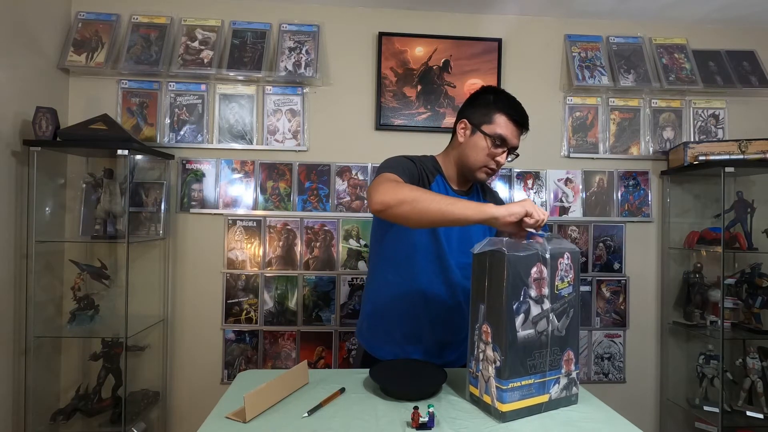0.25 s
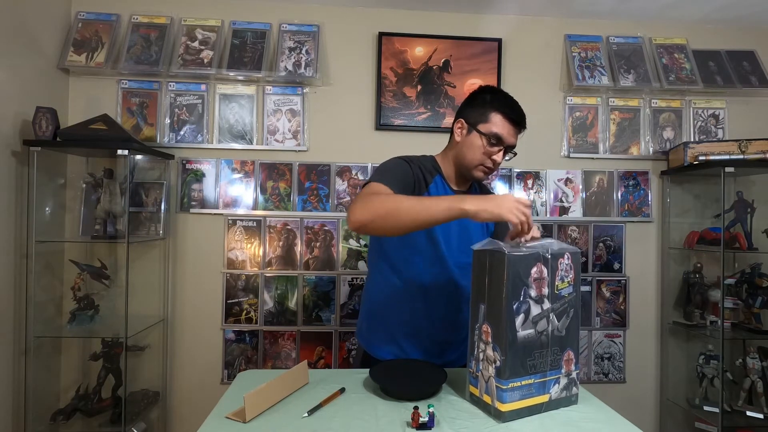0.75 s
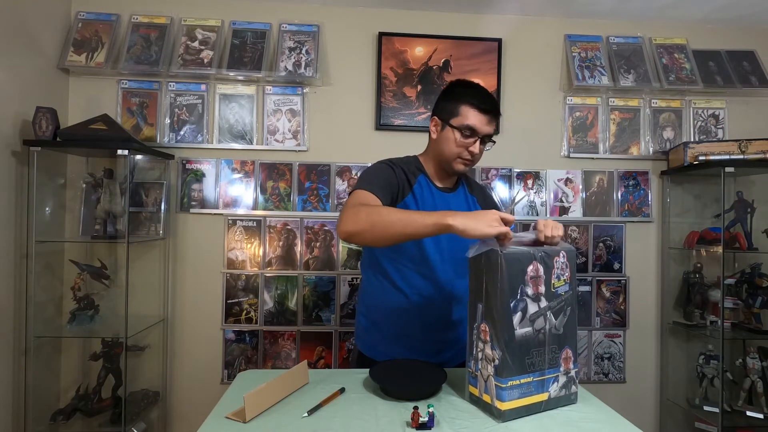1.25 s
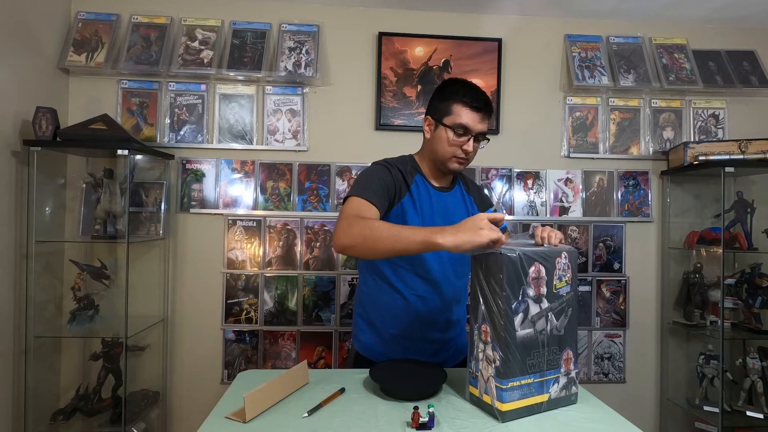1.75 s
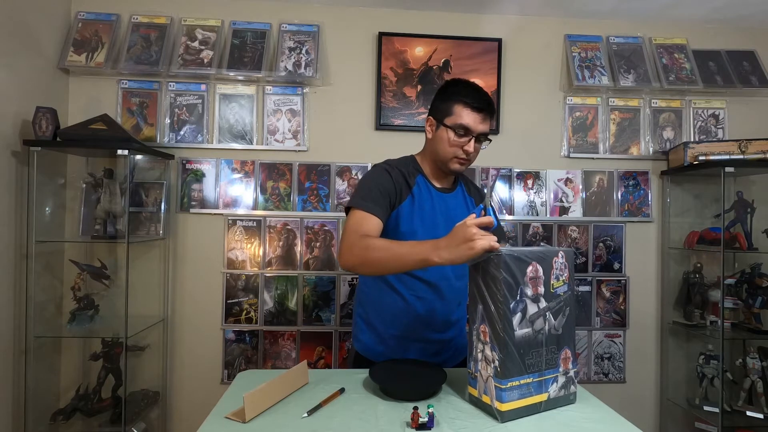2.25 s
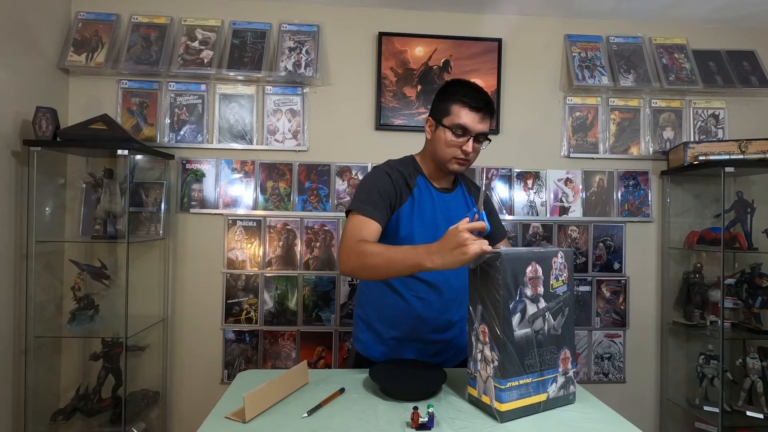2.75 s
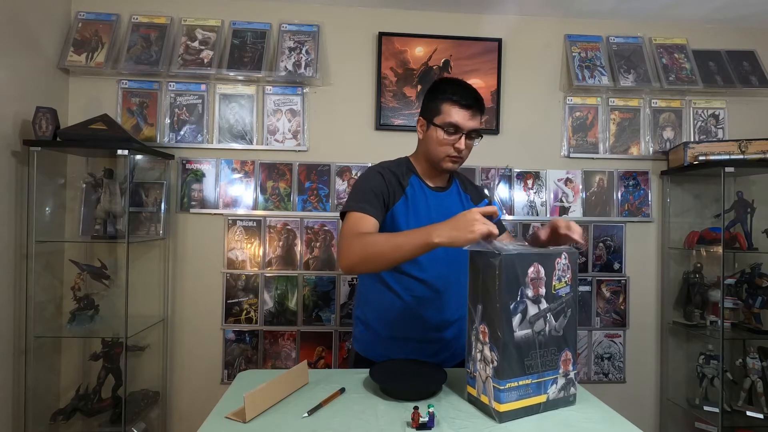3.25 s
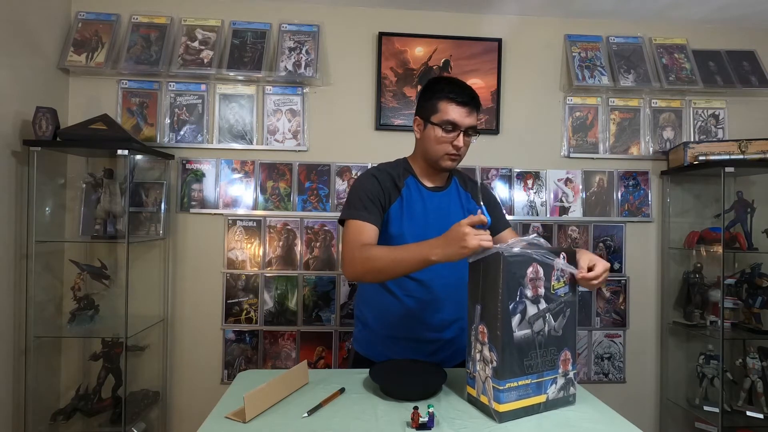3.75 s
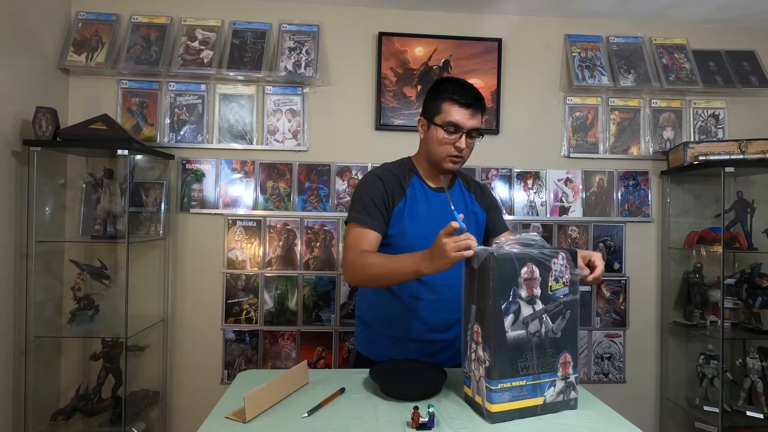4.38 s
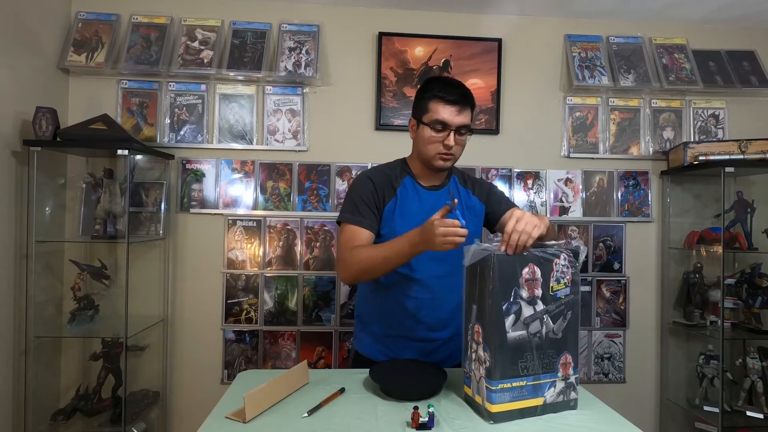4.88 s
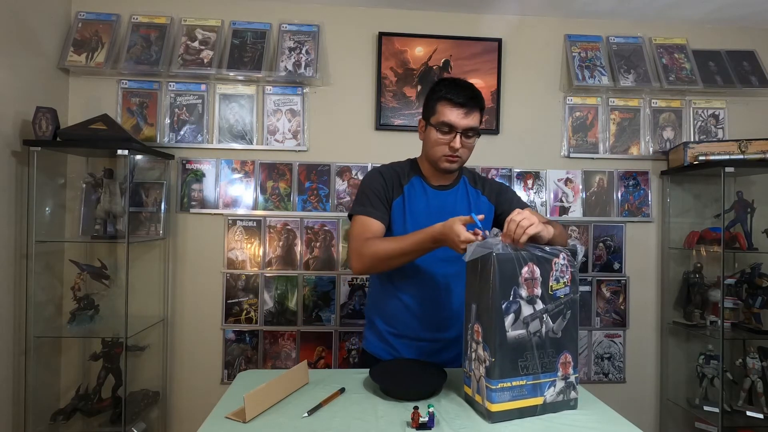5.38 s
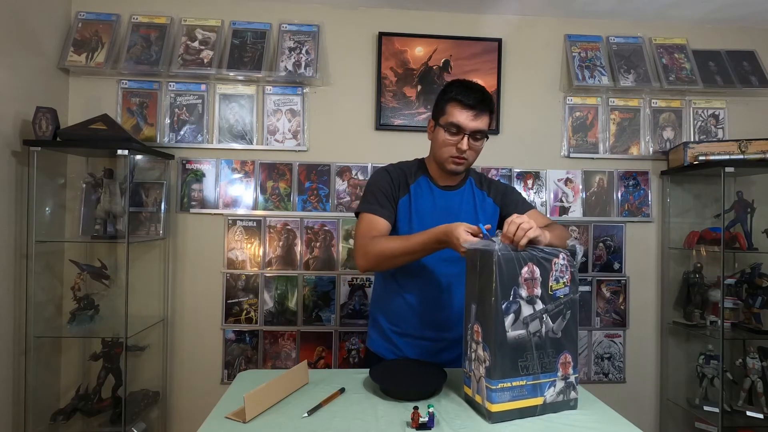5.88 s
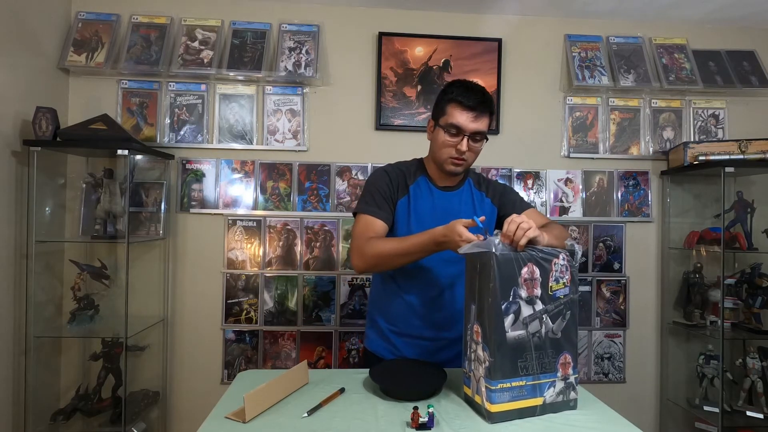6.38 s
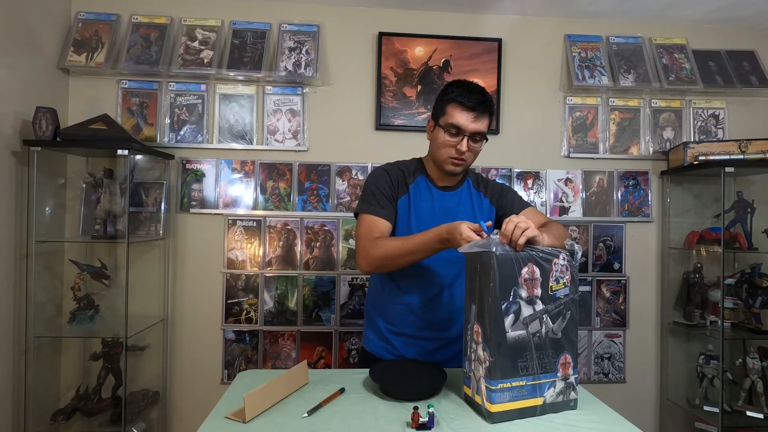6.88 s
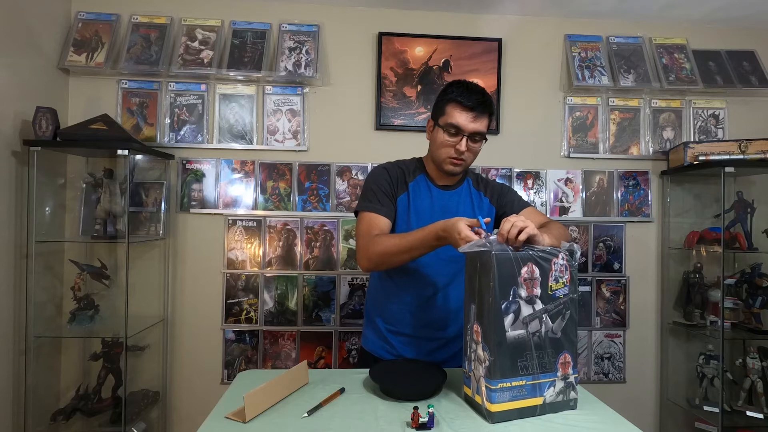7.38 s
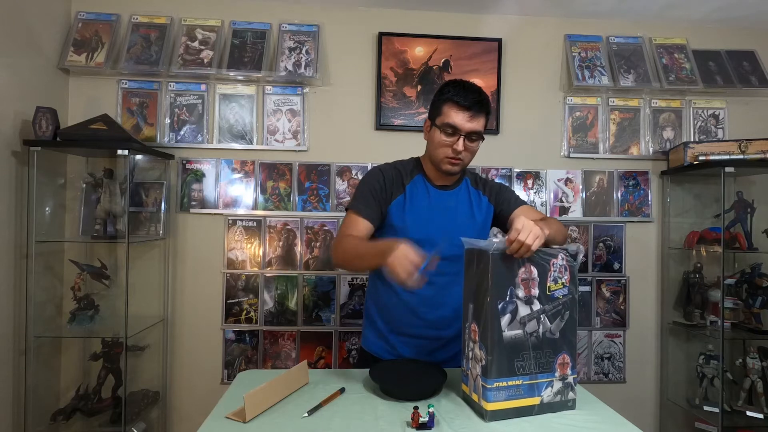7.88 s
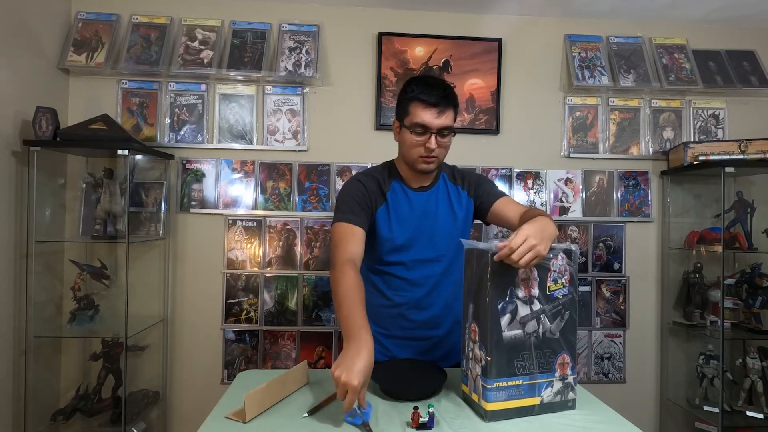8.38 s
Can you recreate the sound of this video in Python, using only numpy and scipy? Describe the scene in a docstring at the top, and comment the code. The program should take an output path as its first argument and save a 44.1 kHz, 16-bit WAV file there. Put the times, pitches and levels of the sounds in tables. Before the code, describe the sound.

Irregular sharp plastic crackles and light box taps in a furnished room, with low air buffeting the microphone and a brief scissor rattle at the end.

```python
"""Sharp snaps and fine crinkling come first: stiff plastic film is cut and pulled off a cardboard box
in a furnished room. Creases flex patches of film and tap the box; at the end scissors, modelled as
ringing modes, rattle on the table. A draught, probably from a fan, carries eddies past the two ports
of a camera microphone, each port on its own, over a steady hum of air made of shaped noise."""
import sys
import numpy as np
from scipy import signal
from scipy.fft import rfft, irfft
from scipy.io import wavfile

SR = 44100
rng = np.random.default_rng(int(sys.argv[2]) if len(sys.argv) > 2 else 0)


def transcribe(u):
    """Save the signal u as a 16-bit wav file named by the first command-line argument.

    u: samples, shape (n,) or (channels, n), limited to [-1, 1]; the rate is SR.
    q: integer samples, one column per channel.
    """
    v = np.clip(np.atleast_2d(u).T, -1, 1)
    q = np.round(v * 32767).astype(np.int16)
    wavfile.write(sys.argv[1], SR, q)


N = 381024  # samples

# All levels in the tables are relative: later gains, filters or chance act on them.
# Pulls and squeezes of the hands on the film: start_s, hold_s, crinkle_level_db, middle_pitch_hz
HAND_PULLS = [(0.0, 0.0028, -39.5, 2570), (0.2, 0.0082, -58, 2120), (0.367, 0.054, -41, 2600),
              (0.632, 0.022, -51, 2790), (0.744, 0.025, -50, 3223), (0.843, 0.065, -40.5, 3050),
              (1.058, 0.078, -43, 2800), (1.219, 0.079, -41, 3130), (1.406, 0.26, -47.5, 3110),
              (1.73, 0.17, -54.5, 3500), (2.005, 0.38, -49, 3181), (2.457, 0.19, -53.5, 3208),
              (2.677, 0.41, -61, 3070), (2.972, 0.25, -47.5, 3014), (3.335, 0.011, -51, 2900),
              (3.517, 0.49, -43.5, 3296), (4.241, 0.096, -39.5, 2630), (4.472, 0.039, -43, 3053),
              (4.576, 0.081, -52.5, 3300), (4.842, 0.075, -58, 2920), (4.991, 0.089, -51.5, 3720),
              (5.14, 0.15, -52.5, 2600), (5.521, 0.24, -58.5, 2600), (5.76, 0.046, -50.5, 2585),
              (6.096, 0.027, -56.5, 3790), (6.228, 0.027, -51, 2220), (6.557, 0.017, -54.5, 2230),
              (6.72, 0.061, -63.5, 2600), (7.231, 0.035, -57.5, 1722), (7.347, 0.12, -62.5, 2600),
              (7.601, 0.17, -58.5, 2600), (7.795, 0.18, -64, 3017), (8.004, 0.056, -54, 3930),
              (8.112, 0.11, -55, 3005), (8.42, .06, -52.5, 2988)]
PULL_RISE_DB_PER_S, PULL_FALL_DB_PER_S, SLACK_DB, SLACK_HZ = 282, 154, -77, 2600
# Single creases snapping:
# time_s, low_patch_hz, low_patch_db, high_patch_hz, high_patch_db, box_tap_db
CREASE_SNAPS = [(0.0214, 2220, -23, 4240, -34, -23), (0.309, 2370, -38, 5040, -47, -30),
                (0.3336, 2480, -16, 4260, -15.5, -37), (0.3418, 2470, -17, 3620, -22, -36),
                (0.3973, 2300, -14.5, 5340, -25, -28), (0.4182, 3430, -24, 4220, -19, -17),
                (0.4821, 3200, -19.5, 4950, -30, -14), (0.592, 3120, -38, 3830, -39, -43),
                (0.6328, 3290, -26, 4500, -30, -25), (0.6717, 2950, -25, 4240, -41, -34),
                (0.7262, 3280, -22, 4800, -19.5, -48), (0.7577, 2340, -21.5, 3920, -33, -36),
                (0.8285, 3100, -32, 3620, -29, -47), (0.8717, 3010, -22.5, 3820, -19, -28),
                (0.9169, 2720, -15.5, 3700, -17, -16), (1.0352, 2600, -22, 4070, -20.5, -44),
                (1.1422, 2000, -23.5, 4080, -27, -36), (1.1679, 2770, -33, 3790, -22, -35),
                (1.2043, 3250, -30, 4090, -25, -21), (1.268, 3400, -31, 4540, -21, -49),
                (1.3114, 3600, -24, 3640, -23, -44), (1.3992, 3360, -27, 3810, -28, -35),
                (1.4309, 3120, -19, 3770, -29, -26), (1.4816, 2840, -32, 8570, -30, -34),
                (1.5251, 3040, -20.5, 3630, -29, -32), (1.5886, 2330, -31, 6070, -30, -43),
                (1.6261, 3000, -42, 5170, -25, -44), (1.6472, 2690, -23, 8360, -23.5, -32),
                (1.722, 3480, -44, 4950, -16.5, -32), (1.7525, 3330, -40, 3700, -43, -44),
                (1.786, 2780, -27, 3700, -38, -37), (1.806, 2480, -36, 4240, -37, -29),
                (1.8196, 2455, -23, 4530, -25, -35), (1.8706, 3540, -25, 3860, -32, -49),
                (1.9757, 3290, -31, 4360, -26, -43), (1.9978, 3200, -29, 4650, -25, -26),
                (2.0466, 3280, -21, 5060, -28, -44), (2.0676, 2560, -21, 3607, -29, -28),
                (2.0933, 3510, -39, 4104, -26.5, -22), (2.206, 3580, -40, 4300, -30, -44),
                (2.323, 3400, -30.5, 5150, -34, -37), (2.4332, 1750, -28, 4550, -26.5, -27),
                (2.4782, 2580, -40, 3600, -32.5, -46), (2.5175, 3420, -33, 4290, -30, -55),
                (2.5475, 2560, -36, 4160, -25.5, -29), (2.7224, 3120, -24.5, 3915, -30, -36),
                (2.759, 3470, -28, 3620, -39, -46), (2.7969, 3443, -22.5, 3660, -46, -38),
                (2.9434, 2470, -28.5, 4050, -46, -44), (2.9839, 3240, -30, 3700, -29, -30),
                (3.1227, 3083, -18, 3590, -28, -32), (3.1744, 3600, -25, 4350, -23, -44),
                (3.1976, 2670, -17.5, 4370, -19.5, -39), (3.2173, 2800, -21, 5040, -24, -42),
                (3.424, 3473, -35, 4763, -27.5, -22), (3.4915, 3414, -32, 3630, -40, -38),
                (3.6506, 1800, -29, 5075, -19, -34), (3.676, 3040, -25, 4850, -22, -33),
                (3.7458, 3020, -28, 4734, -24, -32), (3.8644, 3400, -31, 4070, -22, -30),
                (3.916, 3250, -33, 4348, -26, -39), (3.9743, 2680, -35, 4600, -23, -40),
                (3.9825, 3450, -23, 4220, -27.5, -49), (4.0387, 2700, -44, 5466, -24.5, -37),
                (4.1156, 3568, -47, 5580, -25.5, -47), (4.1787, 3100, -43, 4500, -23, -41),
                (4.2755, 3179, -20.5, 3630, -41, -31), (4.3325, 1880, -32, 4000, -20.5, -30),
                (4.463, 3300, -26, 4670, -36, -39), (4.574, 3660, -48, 4333, -31, -45),
                (4.808, 3160, -36, 4480, -45, -48), (4.8906, 2199, -21.5, 4068, -18.5, -13.5),
                (4.9965, 3230, -39, 3980, -36, -44), (5.0271, 1816, -33, 4330, -20, -41),
                (5.064, 3550, -35, 3643, -35, -54), (5.1262, 2190, -34, 3840, -46, -43),
                (5.1529, 1827, -22, 4566, -19.5, -26), (5.1683, 1743, -37, 8660, -32, -36),
                (5.195, 2020, -29, 3750, -40, -52), (5.2171, 3380, -22, 3580, -32.5, -18.5),
                (5.4436, 1790, -31.5, 3870, -26.5, -18.5), (5.5829, 2968, -38, 5013, -32, -48),
                (5.6038, 2800, -28.5, 4250, -31, -42), (5.7556, 1805, -30, 3620, -24, -43),
                (5.7855, 3016, -29, 5640, -32, -24), (5.8358, 3166, -20.5, 3780, -29, -17),
                (6.047, 3547, -41, 3640, -58, -47), (6.0898, 3605, -51, 3794, -18, -18),
                (6.2126, 3287, -25, 3620, -40, -38), (6.2165, 1772, -12, 3640, -16, -28),
                (6.356, 2021, -33, 3572, -34, -33), (6.5465, 1816, -27, 3570, -35, -43),
                (6.6334, 3570, -25.5, 3600, -28, -26), (6.6847, 2224, -23, 7910, -43, -21),
                (6.7171, 3550, -30, 3630, -26, -48), (6.77, 2443, -27.5, 4624, -33.5, -47),
                (6.9025, 3417, -30, 4204, -27, -29), (6.993, 2674, -24.5, 4590, -30, -20),
                (7.0306, 3566, -33.5, 3624, -30, -24), (7.0497, 1870, -43, 3905, -50, -33),
                (7.1174, 1726, -50, 5290, -58, -25), (7.2438, 1684, -46, 3636, -56, -17.5),
                (7.2935, 2164, -27.5, 5206, -25, -41), (7.3444, 2770, -24, 3696, -18, -43),
                (7.4181, 1724, -23, 3800, -20, -41), (7.5398, 2610, -14.5, 3600, -18, -22),
                (7.5442, 3060, -7, 3660, -15, -10), (7.6049, 2323, -19.5, 4563, -22, -28),
                (7.6818, 2716, -27.5, 4947, -32, -54), (7.7302, 3140, -28.5, 3597, -38, -18),
                (7.8019, 1890, -29.5, 3640, -40, -36), (7.8598, 3200, -33, 4180, -31.5, -28),
                (7.9242, 3412, -26, 4680, -23.5, -17), (8.0287, 2860, -42, 4628, -22.5, -42),
                (8.1239, 2768, -24.5, 4485, -46, -49), (8.1635, 3574, -35, 3618, -43, -25),
                (8.1754, 2300, -39, 4698, -25, -38), (8.4357, 2354, -30, 3632, -38, -35),
                (8.469, 3460, -34, 3584, -41, -41)]
AFTER_S, AFTER_DB = .02, -7  # small creases after a snap: delay scale, greatest level against the snap
# Film as the microphone colours it: frequency_hz, density_db (per Hz)
FILM_SPECTRUM = [(290, -5.5), (500, -2.5), (698, -7), (906, -7.5), (988, -3.5), (1230, -4.5), (1900, -4),
                 (3250, -4), (4280, -3.5), (8580, -1.5), (12500, -7.5), (16000, -13.5)]
# Modes of the cardboard wall under the film, before chance: frequency_hz, width_hz, level_db
BOX_MODES = [(1040, 110, -24), (1170, 50, -3), (1260, 97, 13.5), (1730, 360, 8.5), (660, 450, -10)]
# Scissors meeting the table:
# time_s, level_db, rattle_t60_s, table_thud_db (against level_db), brightness_db (per octave)
SCISSOR_TOUCHES = [(8.3155, -28, 0.009, -46, 24), (8.322, -39, 0.012, -13, 20),
                   (8.3343, -25.5, 0.19, -18.5, 1), (8.5013, -21.5, 0.2, -6.5, 12),
                   (8.5429, -14, 0.061, -4.5, 3), (8.562, -21.5, 0.099, -5.5, -10),
                   (8.579, -27, 0.1, -4.5, 1), (8.614, -30, 0.11, -9, 5)]
# Modes of blades and handles: frequency_hz, width_hz, level_db
SCISSOR_MODES = [(556, 86, 2), (900, 150, 4), (1066, 120, 8), (1300, 200, -2), (1840, 230, 14),
                 (2380, 220, 2), (2670, 170, 0), (2920, 230, 11), (3456, 340, 2), (3930, 280, -10),
                 (4662, 190, -2), (5790, 160, -8), (7400, 3400, 0.5)]
# Spectrum of the knocked table top: frequency_hz, density_db (per Hz)
TABLE_SPECTRUM = [(300, -6.5), (450, -4), (545, 6.5), (614, -6), (678, 2), (774, -13), (1100, 3.5),
                  (1430, -1.5), (3520, 2.5), (10700, -26.5), (16000, -54)]
# Reverberation by band: frequency_hz, t60_s, echo_strength_db
ROOM_DECAY = [(290, 0.37, 4), (1220, 0.33, -3), (3500, 0.27, 1.1), (8500, 0.28, -1.5), (14800, 0.26, -7)]
NEAR_S, NEAR_DB = .025, -9.5  # first echoes from box, body and table: latest delay, middle strength
# Likeness of the two ports: frequency_hz, correlation (no unit)
PORT_LIKENESS = [(100, 1), (300, 1), (700, 0.86), (1400, 0.69), (4000, 0.043), (12000, 0.027)]
# Lean between the two ports: frequency_hz, left_minus_right_db
PORT_LEAN = [(60, 16.5), (120, -4), (240, -1.5), (480, -1), (950, -0.5), (1890, 1.0), (3770, 1),
             (7520, -2.5), (15000, -9.5)]
# Gusts on one port: start_s, port (0 left, 1 right), hold_s, buffeting_level_db
PORT_GUSTS = [(0.145, 1, 0.28, -29), (0.263, 0, 0.092, -25), (0.436, 0, 0.11, -36), (0.818, 1, 0.11, -40),
              (0.871, 0, 0.069, -43), (1.08, 1, 0.15, -36), (1.16, 0, 0.16, -28), (1.205, 1, .35, -25),
              (1.556, 0, 0.31, -31.5), (1.63, 1, 0.07, -25), (1.743, 1, 0.13, -33), (1.953, 0, 0.14, -32),
              (2.106, 0, 0.3, -23), (2.113, 1, 0.3, -28), (2.511, 0, 0.19, -26), (2.53, 1, 0.14, -27),
              (2.761, 1, 0.066, -36.5), (2.942, 1, 0.099, -25), (2.95, 0, 0.08, -34), (3.051, 0, 0.18, -24),
              (3.085, 1, 0.16, -22), (3.271, 0, 0.098, -30.5), (3.29, 1, 0.21, -29), (3.431, 0, 0.058, -23),
              (3.579, 1, 0.13, -35.5), (3.65, 0, 0.082, -37), (3.845, 1, 0.064, -29.5),
              (3.883, 0, 0.083, -34), (3.946, 1, 0.046, -24), (4.1, 0, 0.11, -33), (4.154, 1, 0.19, -22),
              (4.233, 0, 0.078, -25), (4.418, 0, 0.062, -22.5), (4.41, 1, 0.14, -26),
              (4.505, 0, 0.078, -33), (4.88, 0, 0.28, -34), (4.92, 1, 0.098, -28), (5.058, 1, 0.11, -34),
              (5.215, 0, 0.12, -23.5), (5.24, 1, 0.084, -27), (5.445, 0, 0.084, -29.5),
              (5.516, 1, 0.12, -35.5), (5.762, 0, 0.084, -34), (5.781, 1, 0.059, -37),
              (6.003, 1, 0.093, -36.5), (6.271, 1, 0.084, -23.5), (6.307, 0, 0.12, -25),
              (6.401, 1, 0.049, -23), (6.572, 0, 0.43, -26), (6.727, 1, 0.049, -32.5),
              (6.865, 1, 0.17, -23), (7.081, 0, 0.23, -31), (7.076, 1, 0.25, -35.5), (7.425, 0, 0.18, -28),
              (7.678, 1, 0.071, -27), (7.85, 1, 0.3, -24), (7.881, 0, 0.22, -26), (8.117, 1, 0.26, -20.5),
              (8.195, 0, 0.071, -28.5), (8.348, 0, 0.0996, -23.5), (8.497, 0, 0.14, -33.5),
              (8.554, 1, 0.082, -34)]
GUST_RISE_DB_PER_S, GUST_FALL_DB_PER_S, CALM_DB = 350.5, 250, -48
# Eddies at middle air speed: frequency_hz, density_db (per Hz)
EDDY_SPECTRUM = [(8, -32), (25, 1.5), (50, 5.5), (90, -2), (160, -12.5), (280, -25), (500, -54.5),
                 (1000, -94)]
# Small sharp eddies that pop on one port: time_s, port (0 left, 1 right), level_db, pitch_hz (nominal)
PORT_PUFFS = [(0.277, 0, -17.5, 157), (1.228, 1, -16.5, 214), (1.274, 1, -20.5, 205.6),
              (1.312, 1, -16.5, 182.1), (1.484, 1, -16, 166), (1.661, 1, -19, 174.6),
              (1.706, 1, -23, 205.4), (2.158, 1, -17, 200), (2.271, 1, -20, 256), (2.272, 0, -20, 230),
              (2.291, 0, -18, 173.3), (2.338, 0, -11.5, 172.4), (2.338, 1, -18.5, 203),
              (2.399, 0, -15.5, 204), (2.417, 1, -11, 165), (2.533, 0, -9.5, 262.8), (2.535, 1, -10.5, 327),
              (2.557, 0, -17.5, 274), (2.663, 1, -20.5, 207.7), (3.015, 1, -19, 176),
              (3.135, 1, -17.5, 231.6), (3.189, 0, -18, 174.1), (3.188, 1, -19.5, 195),
              (3.462, 1, -13.5, 272), (3.494, 0, -17, 158.7), (3.966, 1, -17, 217.8),
              (4.203, 1, -12.5, 179), (4.224, 1, -7.5, 153.2), (4.27, 1, -21, 233.6),
              (4.436, 1, -14.5, 194.7), (4.521, 1, -18, 194.2), (5.231, 0, -12.5, 130.1),
              (5.248, 0, -12.5, 164.5), (5.361, 0, -16, 194.7), (5.362, 1, -16, 230),
              (5.369, 0, -18, 180.6), (6.31, 1, -17.5, 196.5), (6.339, 0, -18.5, 166.7),
              (6.337, 1, -19, 189.9), (6.425, 1, -12, 194.3), (6.906, 1, -9.5, 207), (6.942, 1, -17, 198.7),
              (6.994, 1, -13.5, 192.4), (7.866, 1, -15, 181), (7.92, 1, -13, 196.9),
              (7.955, 0, -19.5, 176.4), (7.958, 1, -18, 192.7), (8.121, 1, -13, 168.7),
              (8.152, 1, -11, 292.7), (8.203, 1, -13.5, 251), (8.295, 1, -15.5, 205.7),
              (8.37, 1, -25, 202.8), (8.453, 0, -17.5, 150.4)]
# Air noise of the room: frequency_hz, density_db (per Hz)
HUM_SPECTRUM = [(59, -4), (100, 2.5), (186, -4.5), (267, -1.5), (497, -14), (671, -25), (772, -17.5),
                (924, -30.5), (1020, -19.5), (1560, -27), (3470, -69.5), (8000, -75), (12000, -93),
                (22000, -120)]
HUM_DB = -46.5
EDGE_HZ = 15900  # upper band limit of the microphone signal


def snaps():
    """Impulsive release: prominent creases ring the film, and each taps the box at another spot."""
    film, box = np.zeros(N), np.zeros(N)
    chances = rng.uniform(-1, 1, (len(CREASE_SNAPS), 7, 6))
    for (s, low_hz, low_db, high_hz, high_db, box_db), luck in zip(CREASE_SNAPS, chances):
        sign = np.sign(luck[0, 0])
        add(film, s, sign * gain_of(-4.0) * snap(low_hz, low_db, high_hz, high_db, luck[1]))
        spot = [(hz * (1 + 0.15 * a), width, db + 7.9 * b)
                for (hz, width, db), a, b in zip(BOX_MODES, luck[0, 1:], luck[2])]
        add(box, s, sign * gain_of(box_db - 8.5) * ring(spot, count=1000))
        for size, wait, pitch, *flex in luck[3:]:  # four small creases trail the snap
            late = s + 0.003 - AFTER_S * np.log(.51 + wait / 2.05)
            hz = np.sqrt(low_hz * high_hz) * 2 ** (.45 * pitch)
            level = size * gain_of(max(low_db, high_db) + AFTER_DB)
            add(film, late, level * crease(hz, flex, flex_db=-7.0))
    return coloured(film, FILM_SPECTRUM) + box


def snap(low_hz, low_db, high_hz, high_db, luck):
    """Slip and ring: quick slips set two patches of film ringing; the sharp edge carries the treble."""
    t, out = np.arange(400) / SR, np.zeros(400)
    for hz, db, cycles in ((low_hz, low_db, .85), (high_hz, high_db, .95)):
        patch = np.exp(-hz * t / cycles) * np.sin(2 * np.pi * hz * t)
        out += gain_of(db) * patch / np.linalg.norm(patch)
    limits_hz = [low_hz / 1.06, min(high_hz * 1.39, 15000)]
    band = signal.butter(1, limits_hz, "bandpass", fs=SR, output="sos")
    edge = signal.sosfilt(band, np.eye(1, 400)[0])
    out += gain_of(-5.5 + max(low_db, high_db)) * edge / np.linalg.norm(edge)
    out[0] += gain_of(high_db - 12.5)
    slips = np.eye(1, 120)[0]
    slips[(6 + 30 * (luck[::2] + 1)).astype(int)] = .35 * luck[1::2]
    return np.convolve(out, slips)


def crinkle():
    """Crackling noise: small creases of chance size come in clumps; harder pulling folds more of them."""
    level_db, centre_hz = hands()
    per_s = 800 * gain_of(0.33 * (level_db + 50.5))
    clumped = per_s * gain_of(9. * np.tanh(.6 * wander(N, 70.)))
    happens = rng.random(N) < clumped / SR
    size = gain_of(4.8 * np.minimum(rng.exponential(1, N), 3.8)) * happens
    size *= rng.choice([-1, 1], N) / np.sqrt(per_s)  # more creases share the same effort
    pitches = np.geomspace(1200, 10000, 24)
    wanted_hz = centre_hz * 2 ** (.6 * rng.standard_normal(N))
    kind = np.searchsorted(pitches, wanted_hz).clip(0, 23)
    out = np.zeros(N)
    for k, hz in enumerate(pitches):
        tick = crease(hz, rng.uniform(-0.23, 1, 2), flex_db=0.5)
        out += signal.oaconvolve(size * (kind == k), tick)[:N]
    return gain_of(level_db - 7.5) * evened(coloured(out, FILM_SPECTRUM))


def hands():
    """Power summation: pulls add in power, and the strongest pull of the moment dominates the pitch."""
    start, hold, db, hz = np.transpose(HAND_PULLS)
    t, power = swells(start, hold, db, PULL_RISE_DB_PER_S, PULL_FALL_DB_PER_S)
    slack = gain_of(SLACK_DB) ** 2
    total = slack + power.sum(0)
    level_db = 10 * np.log10(total)
    pitch_hz = (slack * SLACK_HZ + hz @ power) / total
    return [np.interp(np.arange(N) / SR, t, course) for course in (level_db, pitch_hz)]


def crease(hz, flex, flex_db):
    """Damped flexure: one tick of energy 1, a sharp edge and two patches flexing for a few cycles."""
    edge, t = np.eye(1, 200)[0], np.arange(200) / SR
    band = signal.butter(2, [hz / 4.2, min(hz * 1.92, 15000)], "bandpass", fs=SR, output="sos")
    tick = signal.sosfilt(band, edge) + 0.05 * (hz / 3000) ** 4.5 * edge
    patches = ((hz * (1 + 0.28 * flex[0]), flex_db), (hz * (1.62 + .5 * flex[1]), flex_db - 9.5))
    for patch_hz, db in patches:
        flexing = np.sin(2 * np.pi * min(patch_hz, 15000) * t)
        tick = tick + gain_of(db) * np.exp(-patch_hz * t * 0.56) * flexing
    return tick / np.linalg.norm(tick)


def scissors():
    """Impact excitation: each touch rattles the loose blades and handles and knocks the table top."""
    t, rattle, knocks = np.arange(9000) / SR, np.zeros(N), np.zeros(N)
    noises = rng.standard_normal((len(SCISSOR_TOUCHES), 9000))
    for (s, db, t60, table_db, tilt_db), noise in zip(SCISSOR_TOUCHES, noises):
        bounces = noise ** 3 * gain_of(db - 20.5 - 60 * t / t60)  # uneven: a few bounces stand out
        bounces[0] += gain_of(db + 10.5)  # the first contact
        add(rattle, s, signal.oaconvolve(bounces, ring(SCISSOR_MODES, tilt_db)))
        add(knocks, s, gain_of(db + table_db - 60 * t / t60) * noise[::-1])
    soften = signal.butter(2, 9000., fs=SR, output="sos")  # the rattle has a soft treble
    return signal.sosfilt(soften, rattle) + coloured(knocks, TABLE_SPECTRUM)


def ring(modes, tilt_db=0, count=2000):
    """Modal superposition: dying sines of energy 1 in all; tilt_db per octave favours the high modes."""
    t, out = np.arange(count) / SR, np.zeros(count)
    for hz, width, db in modes:
        level = gain_of(db + tilt_db * np.log2(hz / 2500)) * np.sqrt(width)
        out += level * np.exp(-np.pi * width * t) * np.sin(2 * np.pi * hz * t)
    return out / np.linalg.norm(out)


def room(x, wet_db):
    """Direct and reflected sound: right port first; echoes change steadily among four random patterns."""
    lean = gain_of(read(PORT_LEAN, np.fft.rfftfreq(N, 1 / SR)) / 2)
    late = np.append([0, 0], x[:-2])  # two samples later on the left
    out = irfft([rfft(late) * lean, rfft(x) / lean], N)
    turn = np.arange(N) / SR * 9.  # nine crossfades a second
    for k in range(4):
        share = np.cos(np.pi / 2 * ((turn - k + 2) % 4 - 2).clip(-1, 1))
        out += gain_of(wet_db) * signal.oaconvolve((x * share)[None], echoes(), axes=1)[:, :N]
    return out


def echoes():
    """Reverberant decay: single early echoes, then sparse random taps, each band dying at its own rate."""
    taps = np.zeros((2, SR // 2))
    jitter = rng.integers(0, 10, (2, (SR // 2 - 101) // 10))
    at = np.arange(90, SR // 2 - 20, 10) + jitter
    np.put_along_axis(taps, at, rng.choice([-1., 1.], at.shape), 1)
    hz, t, z = signal.stft(taps, SR, nperseg=128)
    band, t60, strength_db = np.transpose(ROOM_DECAY)
    t60, strength_db = (read(np.c_[band, c], hz)[:, None] for c in (t60, strength_db))
    decaying = z * gain_of(strength_db - 60 * t / t60)
    tail = spread(*signal.istft(decaying, SR, nperseg=128)[1])
    near = np.zeros_like(tail)
    for wait, left, right in rng.uniform(-1, 1, (7, 3)):
        place = 40 + round((wait + 1) / 2 * NEAR_S * SR)
        near[:, place] = gain_of(NEAR_DB - 10.7 * wait) * np.array([left, 0.65 * left + .5 * right])
    return near + tail / np.sqrt(np.sum(tail ** 2) / 2)


def spread(left, other):
    """Partial coherence: two port signals share PORT_LIKENESS and differ in level by PORT_LEAN."""
    hz = np.fft.rfftfreq(len(left), 1 / SR)
    same = np.clip(read(PORT_LIKENESS, hz), -1, 1)
    lean = gain_of(read(PORT_LEAN, hz) / 2)
    a, b = rfft(left), rfft(other)
    return irfft([a * lean, (same * a + np.sqrt(1 - same ** 2) * b) / lean], len(left))


def draught():
    """Frozen turbulence: a row of eddies is carried past each port; faster air is louder and higher."""
    start, port, hold, db = np.transpose(PORT_GUSTS)
    t, power = swells(start, hold, db, GUST_RISE_DB_PER_S, GUST_FALL_DB_PER_S)
    size = 3 * N
    shape = gain_of(read(EDDY_SPECTRUM, np.fft.rfftfreq(size, 1 / SR)))
    out = []
    for k in range(2):
        total = gain_of(CALM_DB) ** 2 + power[port.round() == k].sum(0)
        port_db = np.interp(np.arange(N) / SR, t, 10 * np.log10(total))
        row = irfft(rfft(rng.standard_normal(size)) * shape, size)
        lumps_db = 4.5 * np.tanh(wander(N, 14.34))
        speed = np.clip(gain_of(.25 * (port_db + lumps_db + 28)), .3, 2.9)  # 1 is middle air speed
        passing = np.interp(np.cumsum(speed), np.arange(size), evened(row))
        out.append(gain_of(port_db + lumps_db) * passing)
    return np.array(out)


def puffs():
    """Pressure pulse: a quick push between two sucks, or the reverse, a little lopsided by chance."""
    out = np.zeros((2, N))
    times = np.transpose(PORT_PUFFS)[0]
    eddy = np.cumsum(np.diff(times, prepend=0) > .005)  # one eddy pushes both ports alike
    chances = rng.uniform(-1.03, 1, (len(PORT_PUFFS) + 1, 2))[eddy]
    for (s, port, db, hz), (sign, skew) in zip(PORT_PUFFS, chances):
        turns = np.arange(-2, 2, hz / SR)
        pop = np.exp(-(turns / 0.34) ** 2) * np.cos(2 * np.pi * (0.6 * turns - 0.21 * skew))
        add(out[round(port)], s - 2 / hz, np.sign(sign) * gain_of(db + 9.0) * pop)
    return out


def hum():
    """Shaped broadband noise: the air noise of the room, its level wavering slowly."""
    shape = gain_of(read(HUM_SPECTRUM, np.fft.rfftfreq(N, 1 / SR)))
    air = irfft(rfft(rng.standard_normal((2, N))) * shape, N)
    return gain_of(HUM_DB + 0.73 * wander(N, 4.3)) * evened(spread(*air))


def swells(start, hold, db, rise, fall, step=100):
    """Exponential growth and decay: power of each swell as it rises, holds and falls; one row each."""
    t = np.arange(0, N + step, step) / SR
    start, hold, db = (np.asarray(c)[:, None] for c in (start, hold, db))
    level_db = db - rise * (start - t).clip(0) - fall * (t - start - hold).clip(0)
    return t, gain_of(level_db) ** 2


def wander(count, hz):
    """Low-passed noise: a slow random course of rms 1."""
    f = np.fft.rfftfreq(count, 1 / SR)
    return evened(irfft(rfft(rng.standard_normal(count)) / (1 + (f / hz) ** 4), count))


def coloured(x, points):
    """Minimum-phase filtering: the phase of a causal filter of energy 1 follows from its log gain."""
    gain_db = np.maximum(read(points, abs(np.fft.fftfreq(4096, 1 / SR))), -100)
    log_gain = np.log(gain_of(gain_db))
    taps = np.fft.ifft(np.exp(np.conj(signal.hilbert(log_gain)))).real[:2048]
    return signal.oaconvolve(x, taps / np.linalg.norm(taps))[:len(x)]


def read(points, hz):
    """Logarithmic frequency scale: a table is interpolated along it."""
    f, value = np.transpose(points)
    return np.interp(np.log(hz + 1), np.log(f + 1), value)


def gain_of(db):
    """Decibel law: 20 dB is a factor of ten in amplitude."""
    return 10 ** (np.asarray(db) / 20)


def evened(x):
    """Root mean square: the signal is scaled to rms 1."""
    return x / np.sqrt(np.mean(x ** 2) + 1e-20)


def add(mix, s, sound):
    """Linear superposition: a sound is added from s seconds on and cut at the end of the mix."""
    part = mix[..., round(s * SR):][..., :sound.shape[-1]]
    part += sound[..., :part.shape[-1]]


def scene():
    """Superposition of film, scissors, buffeting and hum at the two ports."""
    handling = room(snaps(), wet_db=-0.07) + room(crinkle(), wet_db=2.0) + room(scissors(), wet_db=-3.0)
    buffet = .5 * np.tanh((draught() + puffs()) / .5)  # the capsules yield under the strongest gusts
    return handling + buffet + hum()


def record(dry):
    """Band limitation: the bass roll-off of the microphone, then the upper limit."""
    firm = signal.sosfilt(signal.butter(2, 18., "highpass", fs=SR, output="sos"), dry)
    band_limit = signal.firwin(511, EDGE_HZ, window=("kaiser", 9), fs=SR)
    return signal.oaconvolve(firm, band_limit[None], "same")


dry = scene()
out = record(dry)
transcribe(out)
```